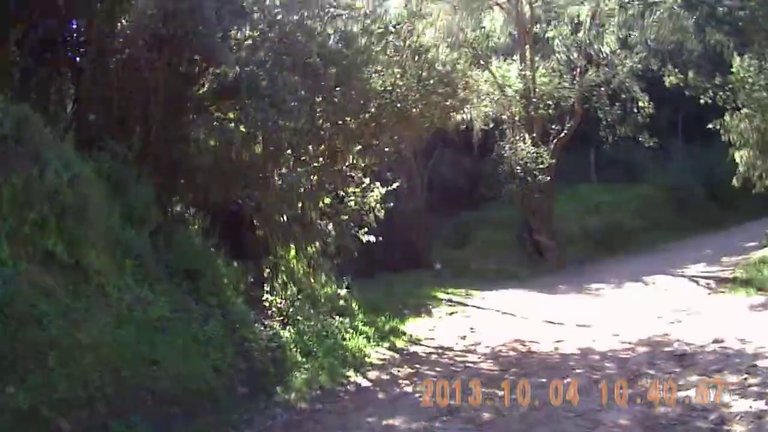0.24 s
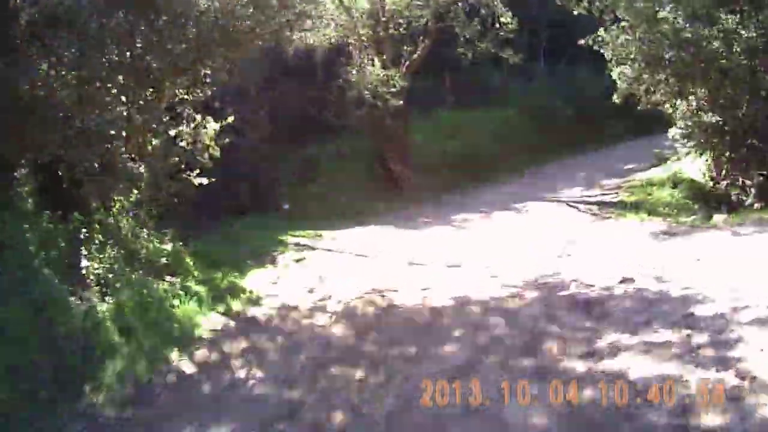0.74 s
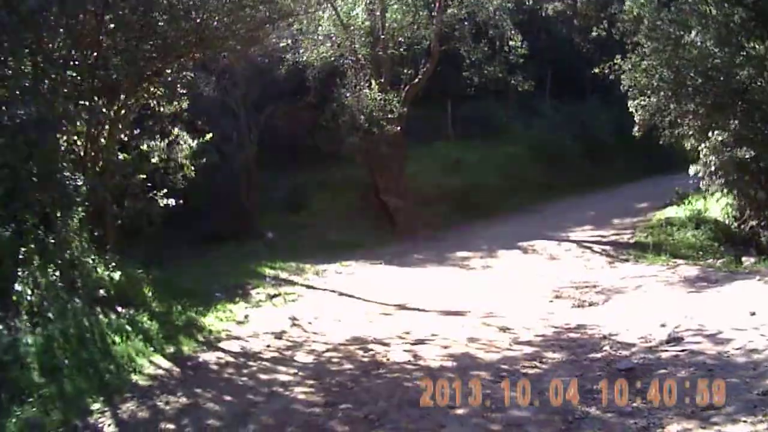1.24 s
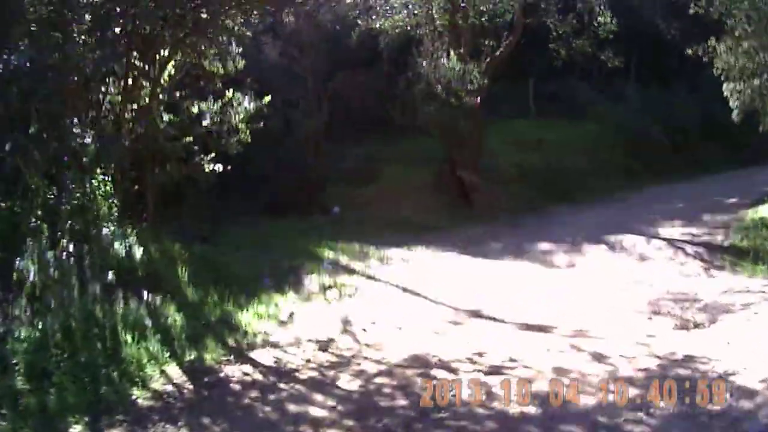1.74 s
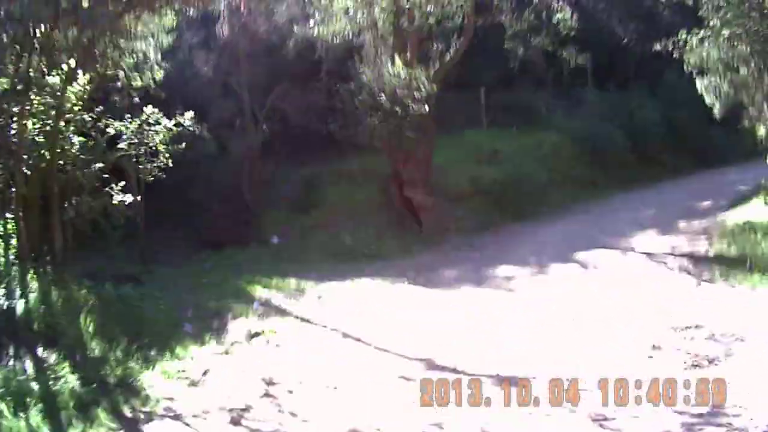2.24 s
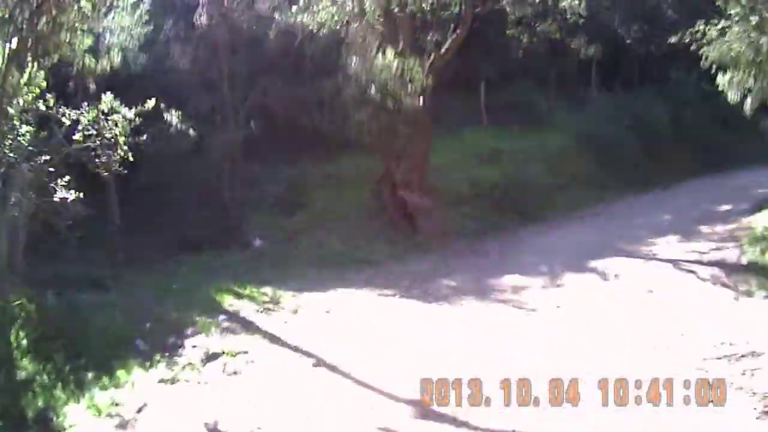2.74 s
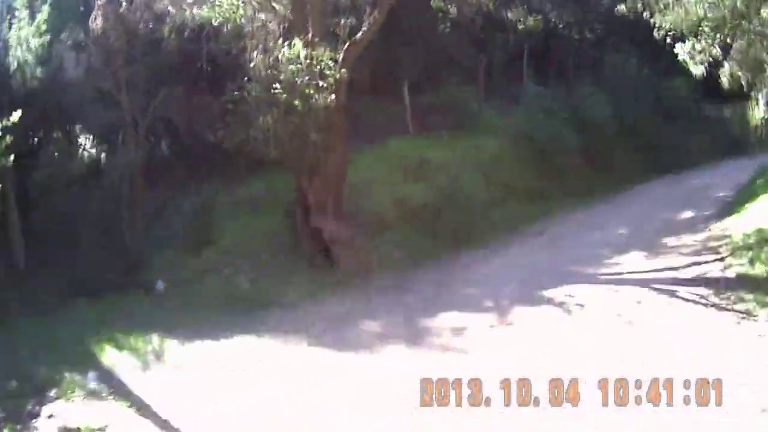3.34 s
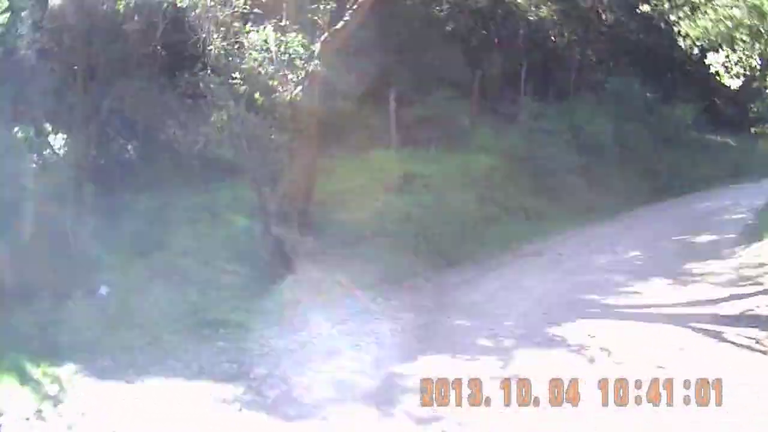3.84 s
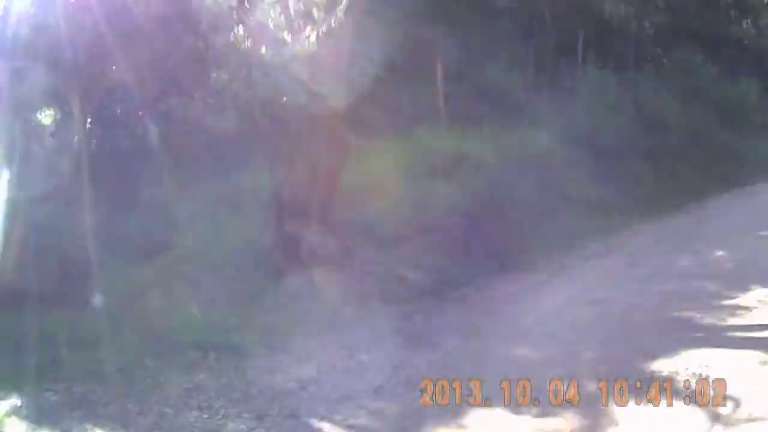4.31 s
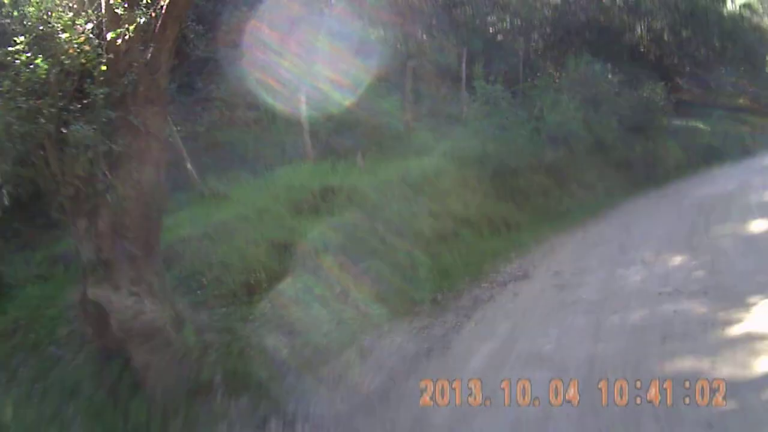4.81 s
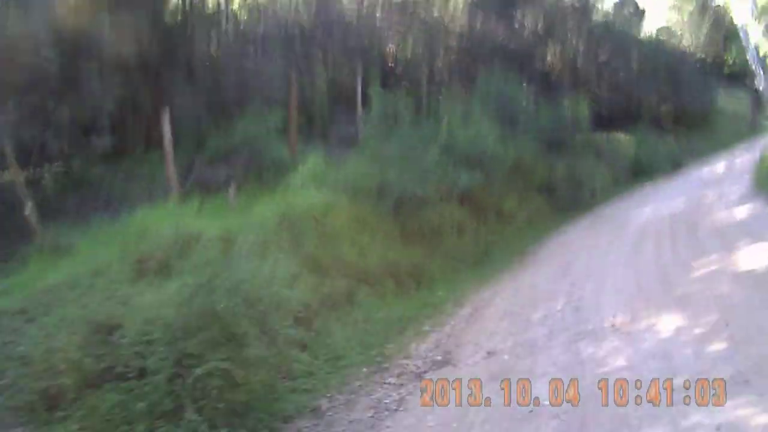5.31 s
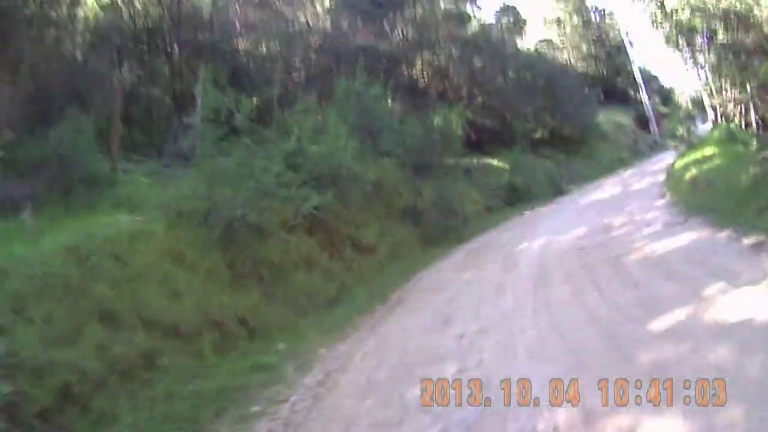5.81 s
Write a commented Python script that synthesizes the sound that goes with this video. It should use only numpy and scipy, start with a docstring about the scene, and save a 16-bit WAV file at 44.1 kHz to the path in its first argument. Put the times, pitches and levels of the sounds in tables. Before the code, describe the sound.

Close, dry, narrow-band onboard sound, mono and overloaded on peaks, of a mountain bike rolling over loose gravel for about six seconds. Tyre rumble, gritty ticking and low wind buffeting run throughout, swelling with rough ground. From 0.2 to 0.8 s a brake moans, low, nearly pure and juddering, weakening after 0.6. A hard double knock lands at 0.74, then more at 1.15-1.4, with a short low frame shudder at 1.3. A calmer stretch follows until about 2.05. From 2.3 to 3.5 knocks crowd into rapid thudding, clacking rattles, densest and grittiest around 2.7-3.4. Another rattle comes at 3.7, then scattered clusters from 4.2 to 5.0, with buffeting stronger. Sharp stone pings strike the bike at 5.2 and 5.36. Final boxy jolts rattle at 5.5-5.8, the last with a brief sinking thump, and the gravel roughens again towards the end.

```python
"""Stones and ruts knock a small camera in its mount on a mountain bike rolling down a gravel road.
Each knock sums decaying modes and a burst of chatter; grit ticks ring the case, again as decaying modes.
Random impulses through resonances make the tyre rumble; shaped noise makes the wind.
A wobbling sine is the brake's moan near the start; short sinking sines are the frame's shudders.
A narrow-band converter overloads on peaks above its full scale."""
import sys
import numpy as np
from scipy import signal
from scipy.fft import rfft, irfft
from scipy.io import wavfile
from scipy.ndimage import map_coordinates

SR = 44100
rng = np.random.default_rng(int(sys.argv[2]) if len(sys.argv) > 2 else 0)


def dump(signal):
    """Clip the signal to [-1, 1] and save it as 16-bit WAV at the path in sys.argv[1]."""
    limited = np.clip(np.atleast_2d(signal).T, -1, 1)
    pcm = np.round(limited * 32767).astype(np.int16)
    wavfile.write(sys.argv[1], SR, pcm)


N = 267246

# Stretches where the wheels cross loose stones.
# Each row: start in seconds, length in seconds, grit level in dB before the scene's trim.
LOOSE_PATCHES = [(0.191, 0.21, -24.5), (1.148, 0.3, -23.5), (1.297, 0.083, -16), (1.504, 0.069, -23.5),
                 (1.618, 0.11, -27), (2.304, 0.059, -23), (2.606, 0.18, -24), (3.02, 0.14, -18.5),
                 (3.218, .11, -17), (3.639, .11, -23.5), (3.852, 0.093, -28.5), (4.308, 0.14, -21.5),
                 (4.507, 0.109, -27.5), (4.706, 0.28, -24), (4.789, .11, -18.5), (5.541, .11, -25.5),
                 (5.868, 0.13, -20.5)]


def from_db(db):
    """An amplitude ratio is ten to the power of decibels over twenty."""
    return 10 ** (np.asarray(db) / 20)


def rms_one(x):
    """Dividing by the root mean square gives unit effective level."""
    return x / np.sqrt(np.mean(x ** 2) + 1e-20)


def in_time(rows):
    """Linear interpolation carries each column of a breakpoint curve to every sample."""
    seconds, *columns = np.transpose(rows)
    return [np.interp(np.arange(N) / SR, seconds, column) for column in columns]


def drift(rate):
    """A spline through random knots, `rate` per second, is a smooth fluctuation of rms 1."""
    knots = rng.standard_normal(4000)
    return rms_one(map_coordinates(knots, [np.arange(N) / SR * rate], order=3, mode="wrap"))


def resonate(x, hz, width_hz):
    """A pole pair is a damped oscillator: its bandwidth sets the damping, its peak gain is about 1."""
    radius = np.exp(-np.pi * width_hz / SR)
    zeros = np.array([1, 0, -1]) * (1 - radius * radius) / 2
    poles = [1, -2 * radius * np.cos(2 * np.pi * hz / SR), radius * radius]
    return signal.lfilter(zeros, poles, x + 1e-18)


def soften(x, hz, order=2):
    """A Butterworth low-pass attenuates ever more strongly above its cutoff."""
    return signal.sosfilt(signal.butter(order, hz, fs=SR, output="sos"), x)


def add(out, s, sound):
    """Superposition: a sound is summed in from time s in seconds."""
    start = max(round(s * SR), 0)
    out[start:start + len(sound)] += sound[:max(N - start, 0)]


def struck(hz, gain, t60, contact_s):
    """Modal response to a blow: decaying sines build up over the contact time, cut at 1/12 s."""
    t = np.arange(SR // 12) / SR
    decays = np.exp(-np.log(1000) * np.outer(t, 1 / t60))
    rings = np.sin(2 * np.pi * np.outer(t, hz)) * decays
    return rings @ gain * (1 - np.exp(-t / contact_s))


def blows():
    """Excitation by impacts: lists every blow's time and its thud, clack, case ring and tick in dB."""
    # Jolts make the camera bounce in its mount. Each row: start in seconds, number of knocks,
    # gap in seconds, thud in dB, clack in dB against the thud.
    jolts = [(.736, 2, .013, 1.5, -12), (.823, 1, .018, -15, -19), (1.15, 1, .018, -2, -15),
             (1.194, 2, .015, -4, -17), (1.3, 2, 0.016, 0.5, -6), (1.358, 3, 0.014, -3.5, 1.5),
             (1.773, 1, .018, -9.5, -14), (2.05, 2, 0.014, -6, -17), (2.16, 1, .018, -15, -2.5),
             (2.232, 1, .018, -9.5, -18), (2.276, 1, .018, -5.5, -24), (2.308, 4, 0.016, 0, -5),
             (2.402, 1, .018, -11, -10), (2.421, 3, 0.015, -5, 3.5), (2.608, 2, 0.017, -4, -12.5),
             (2.652, 3, .014, -4, -13), (2.751, 2, .015, -0.5, -7.5), (2.823, 1, .018, 1.5, -7.5),
             (2.842, 3, 0.018, -1, 1.5), (2.9, 4, 0.021, -3, 2.5), (2.998, 1, .018, -3, -5),
             (3.037, 4, .02, -7.5, 4.5), (3.135, 2, 0.016, 1, -3), (3.279, 3, .014, 2, -7),
             (3.353, 1, .018, -12.5, -10), (3.43, 1, .018, -8.5, -17), (3.464, 3, .019, -2.5, -1.5),
             (3.679, 3, 0.029, -3, -0.5), (3.885, 2, 0.016, -10.5, -5.5), (4.083, 1, .018, -9, -20),
             (4.23, 3, .02, -9, -17), (4.31, 2, .014, -4.5, -20), (4.398, 3, .012, -0.5, -22),
             (4.508, 2, 0.013, -2, -11.5), (4.581, 2, 0.018, -2, -2), (4.862, 3, 0.026, -5.5, -0.5),
             (4.965, 1, 0.02, -2, -6.5), (5.012, 1, .018, -15, -20), (5.111, 1, .018, -8, -17),
             (5.169, 1, .018, -4, -19), (5.205, 1, .018, 0.5, -8), (5.387, 3, .032, -13.5, -26),
             (5.527, 1, .018, -7.5, -16), (5.56, 1, 0.017, -6.5, -1), (5.587, 3, 0.016, -5.5, 0.5),
             (5.639, 1, 0.016, -1.5, -3), (5.758, 1, 0.02, -1.5, -5.5)]
    # Flung stones ping on the bike. Each row: start in seconds, case ring in dB, tick in dB.
    pings = [(0.384, -0.5, -2.5), (.736, 11.5, -10), (.954, -8.5, -3.5), (1.001, -2, -19), (2.128, -18, -8),
             (3.282, -1, 3.5), (5.195, 14.5, 15), (5.357, 11, 12)]
    ping_thud_db, ping_clack_db = -27, -24  # against the case ring: the low modes are barely stirred
    jiggle_gap_s = .019  # mean gap between the random knocks on a loose patch
    jiggle_db, jiggle_scatter_db = 16, 2.5  # thud against the patch's grit level, and its spread
    jiggle_clack_db = -12  # against the thud

    def knock(s, db, clack_db):
        """A blow on the mount excites case ring and tick in fixed proportion to the thud."""
        return s, db, db + clack_db, db - 2.5, db - 10.5

    rows = []
    for s, count, gap, db, clack_db in jolts:
        rows += [knock(s + k * gap, db, clack_db) for k in range(round(count))]
    for s, ring_db, tick_db in pings:
        rows.append((s, ring_db + ping_thud_db, ring_db + ping_clack_db, ring_db, tick_db))
    for s, length, db in LOOSE_PATCHES:
        gaps, scatter = rng.gamma(5, 1 / 5, 40), rng.standard_normal(40)
        delays = jiggle_gap_s * (np.cumsum(gaps) - gaps[0])
        for delay, luck in zip(delays, scatter):
            if delay < length:
                thud_db = db + jiggle_db + jiggle_scatter_db * luck
                rows.append(knock(s + delay, thud_db, jiggle_clack_db))
    return rows


def knocks(detune, uneven_db, contact_s, chatter_db, chatter_s):
    """Modal synthesis: a knock rings every mode, while loose faces chatter for a few milliseconds."""
    # Modes of mount and case. Each row: frequency in Hz, relative level in dB, t60 in seconds.
    modes = [(109.5, -9.5, 0.048), (235.2, -5.5, 0.039), (288.6, -12, 0.068), (417.4, 1, 0.021),
             (638, -1.5, 0.011), (884, 4, 0.006), (1116, -1, 0.013), (1569, -0.5, 0.015),
             (1656, -2.5, 0.023), (2430, -11, 0.0065), (2744, -2, 0.0061), (3052, -6, 0.011),
             (3950, -16, 0.016)]
    # Where thud, clack, case ring and tick lie.
    # Each row: frequency in Hz, level in dB added to that part of every blow.
    knock_parts = [(300, -2), (950, 1), (1650, -1.5), (3050, 5)]
    hz, mode_db, t60 = np.transpose(modes)
    part_hz, part_db = np.transpose(knock_parts)
    out, t = np.zeros(N), np.arange(SR // 40) / SR
    chatter_band = signal.butter(2, [450, 2400], "band", fs=SR, output="sos")
    chatter_shape = (1 - np.exp(-t / contact_s)) * np.exp(-(t / chatter_s) ** 2)
    for s, *parts in blows():
        bend, strength, side = rng.standard_normal((3, len(hz)))
        blow_db = np.interp(np.log(hz), np.log(part_hz), parts + part_db)  # between parts in log pitch
        gain = from_db(mode_db + blow_db + uneven_db * strength)
        add(out, s, struck(hz * (1 + detune * bend), gain * np.sign(side), t60, contact_s))
        chatter = rms_one(signal.sosfilt(chatter_band, rng.standard_normal(len(t))))
        add(out, s, from_db(parts[1] + chatter_db) * chatter * chatter_shape)  # follows the clack
    return out


def coarseness():
    """Powers of independent sources add: grit level in dB from the road and its loose patches."""
    # Road between the patches. Each row: time in seconds, grit level in dB before the scene's trim.
    road = [(0, -27), (.06, -36.5), (.25, -20), (.55, -21.5), (.68, -25.5), (.86, -25.5), (1.0, -35.5),
            (1.45, -29.5), (1.78, -29), (1.95, -38.5), (2.22, -28), (2.52, -28.5), (2.9, -19), (3.4, -30),
            (3.95, -29.5), (4.12, -30.5), (4.65, -32), (5.3, -33.5), (5.42, -32.5), (6.05, -24)]
    attack_s, release_s = 0.014, 0.012
    t = np.arange(N) / SR
    power = from_db(in_time(road)[0]) ** 2
    for s, length, db in LOOSE_PATCHES:
        rise = np.clip((t - s) / attack_s, 0, 1)
        fall = np.clip(1 - (t - s - length) / release_s, 0, 1)
        power = power + (from_db(db) * rise * fall) ** 2
    return 10 * np.log10(power)


def grit(level_db, per_s, spread_db, uneven_db, detune, contact_s, sand_db):
    """Impact excitation: small stones ring the case modes in varied balance, over resonant sand noise."""
    # Resonances of the case. Each row: frequency in Hz, relative level in dB, t60 in seconds.
    case_modes = [(734, -26.5, 0.0049), (1090, -8.5, 0.015), (1591, -2.5, 0.025), (1703, 4, 0.015),
                  (2310, -11, 0.016), (2812, -10, 0.02), (3062, -4.5, 0.014), (3647, -15, 0.019)]
    hz, mode_db, t60 = np.transpose(case_modes)
    ticks = np.zeros(N)
    chance = rng.standard_normal((1000, 3, len(hz)))
    times = np.cumsum(rng.gamma(4, 1 / 4, len(chance))) / per_s
    for s, (size, strength, bend) in zip(times[times < N / SR], chance):
        tick_db = mode_db + spread_db * np.tanh(size[0]) + uneven_db * np.tanh(strength)
        gain = from_db(tick_db) * np.sign(size)
        add(ticks, s, struck(hz * (1 + detune * bend), gain, t60, contact_s))
    sand = np.zeros(N)
    for f, db, decay_s in case_modes:
        width_hz = np.log(1000) / np.pi / decay_s  # the bandwidth that gives this t60
        sand += from_db(db) * resonate(rng.standard_normal(N), f, width_hz)
    return from_db(level_db) * (rms_one(ticks) + from_db(sand_db) * rms_one(sand))


def stones(per_s, spread_db):
    """A random impulse train: contacts at chance times, a few much harder than the rest; rms 1."""
    sizes = from_db(spread_db * np.minimum(rng.exponential(1, N), 3)) * rng.choice([-1, 1], N)
    return rms_one(sizes * (rng.random(N) < per_s / SR))


def tyres(level_db):
    """Dense random impacts of knobs and gravel on frame resonances merge into coloured rumble."""
    # Resonances the rolling tyres shake.
    # Each row: frequency in Hz, width in Hz, relative level in dB.
    frame_modes = [(234, 48, -3), (283.9, 13, -4), (416, 38, -10), (540, 250, -28.5)]
    shake = np.zeros(N)
    for hz, width_hz, db in frame_modes:
        shake += from_db(db) * resonate(stones(per_s=3000, spread_db=2.0), hz, width_hz)
    return from_db(level_db) * rms_one(soften(shake, hz=806))


def brake(waver_db, tremble):
    """Stick-slip friction of the pads holds one frame mode in a nearly pure, juddering moan."""
    # Each row: time in seconds, rms level in dB before the waver.
    moan_level = [(.13, -23), (.19, -26), (.205, -5.5), (.45, -2.5), (.56, -2.5), (.585, -11.5), (.66, -9),
                  (.77, -10), (.79, -46.5)]
    pitch_hz, sag_hz_per_db = 277.9, 0.82  # mean pitch at 0 dB; it sags as the pads ease off
    judder_hz, judders_per_s = 9, 35  # depth and rate of a quick wobble in pitch
    level_db, = in_time(moan_level)
    t = np.arange(N) / SR
    held = (t > moan_level[0][0]) & (t < moan_level[-1][0])
    judder = judder_hz * np.sin(2 * np.pi * judders_per_s * t)
    hz = pitch_hz + sag_hz_per_db * level_db + judder
    phase = 2 * np.pi * np.cumsum(hz * (1 + tremble * drift(50))) / SR
    amplitude = np.sqrt(2) * from_db(level_db + waver_db * drift(39.2))
    return held * amplitude * np.sin(phase)


def shudders():
    """Transient oscillation: ruts swing the frame for a few cycles that sink in pitch."""
    # Each row: start in seconds, first and last frequency in Hz, peak in dB, length in seconds.
    rut_swings = [(1.296, 123, 114, -4.5, 0.03), (3.051, 121.6, 109.3, -11, 0.12),
                  (3.262, 117.4, 112.1, -4, 0.036), (4.845, 130.5, 122, -6, 0.065),
                  (5.763, 262, 227, -0.5, 0.026)]
    out = np.zeros(N)
    for s, first_hz, last_hz, db, length in rut_swings:
        hz = np.linspace(first_hz, last_hz, int(length * SR))
        swing = np.sin(2 * np.pi * np.cumsum(hz) / SR)
        add(out, s, from_db(db) * signal.windows.tukey(len(hz), .3) * swing)
    return out


def wind(level_db, lumpy_db):
    """Turbulence and sway at the microphone: low noise of a given spectrum at a fluctuating level."""
    # Each row: frequency in Hz, relative spectral level in dB per Hz.
    wind_spectrum = [(14, -19), (26, -12.5), (38, 3.5), (47, -4), (55, 8.5), (64, -13.5), (80, -4),
                     (112, -4.5), (160, -14), (220, -1), (500, -48)]
    hz, db = np.transpose(wind_spectrum)
    bins = np.maximum(np.fft.rfftfreq(N, 1 / SR), 1)
    shape = from_db(np.interp(np.log(bins), np.log(hz), db, left=-40, right=-90))
    buffeting = rms_one(irfft(rfft(rng.standard_normal(N)) * shape, N))
    return from_db(level_db + lumpy_db * drift(22)) * buffeting


def scene():
    """Superposition: road coarseness drives grit, rumble and buffeting; knocks and tones are added."""
    # Gusts swell and drop the buffeting. Each row: time in seconds, change of level in dB.
    gust_curve = [(0, -1.5), (.35, -5.5), (.49, -10.5), (.62, -0.5), (.85, -1.5), (1.6, -2.5), (2.9, -0.5),
                  (3.25, 1), (3.5, 0.5), (4.25, 2.5), (4.85, 2.5), (5.3, -1.5), (5.78, -3.5), (6.05, 1)]
    grit_db = coarseness()
    rough_db = grit_db + 27.5  # against ordinary gravel at -27.5 dB
    bumps = from_db(5) * knocks(detune=0.032, uneven_db=1.5, contact_s=0.0012,
                                chatter_db=-8, chatter_s=0.0055)
    flickering_db = grit_db - 1.5 + 2.2 * drift(25)  # trimmed and uneven
    gravel = grit(flickering_db, per_s=66, spread_db=1.5, uneven_db=4.5,
                  detune=0.047, contact_s=0.002, sand_db=-8)
    # Rumble and buffeting: level on ordinary gravel in dB, then dB per dB of roughness.
    rumble = tyres(-20.5 + 0.89 * rough_db)
    moan = brake(waver_db=.6, tremble=.008)
    air = wind(-20 + 0.63 * rough_db + in_time(gust_curve)[0], lumpy_db=0.84)
    return (bumps + gravel + rumble + moan + shudders() + air)[None]


def record(dry):
    """Overload: a slow converter clips, smoothing makes flat tops overshoot, and clipping adds treble."""
    band_edge_hz, cutoff_hz = 3632, 16300
    converter_hz, full_scale, output_limit = 8000, .71, .715
    band_filter = signal.cheby1(8, .3, band_edge_hz, fs=SR, output="sos")
    narrow = signal.sosfilt(band_filter, dry[0])
    step = SR / converter_hz
    samples = np.interp(np.arange(0, N + step, step), np.arange(N), narrow)
    overloaded = np.clip(samples, -full_scale, full_scale)
    # Back to the full rate; the smoothing filter cuts off at half the converter rate.
    steps = SR // np.gcd(SR, converter_hz)
    smoothing = signal.firwin(32 * steps + 1, 1 / steps, window=("kaiser", 7))
    smooth = signal.resample_poly(overloaded, SR, converter_hz, window=smoothing)[:N]
    clipped = np.clip(smooth, -output_limit, output_limit)
    return signal.sosfilt(signal.ellip(10, .1, 90, cutoff_hz, fs=SR, output="sos"), clipped)[None]


dry = scene()
out = record(dry)
dump(out)
```